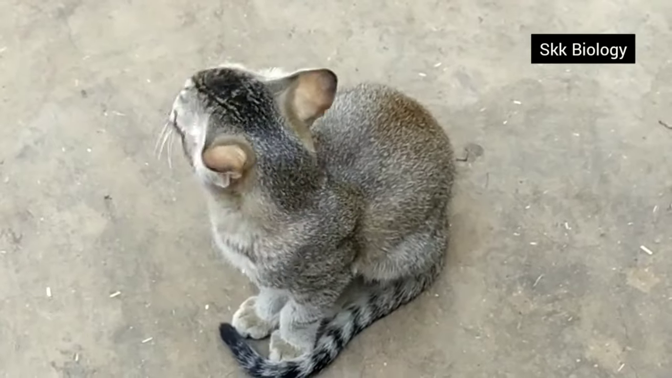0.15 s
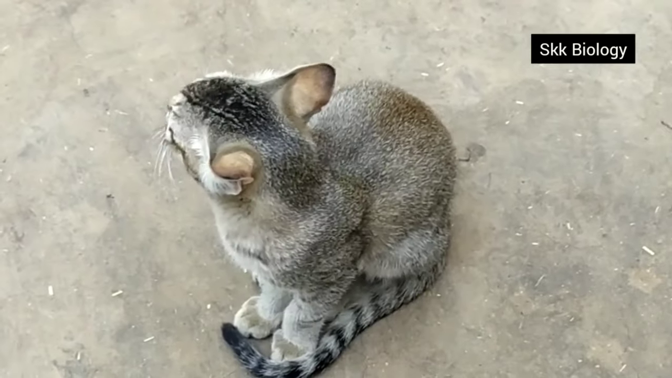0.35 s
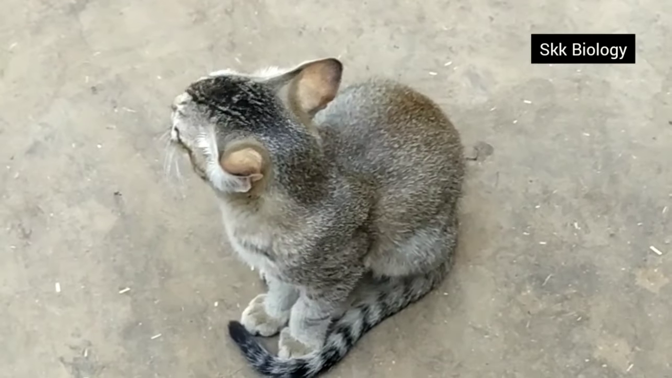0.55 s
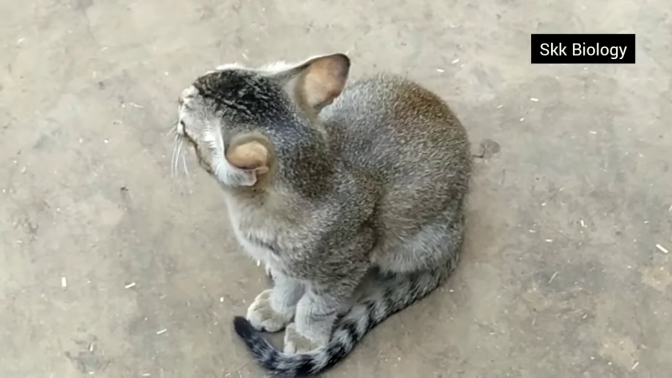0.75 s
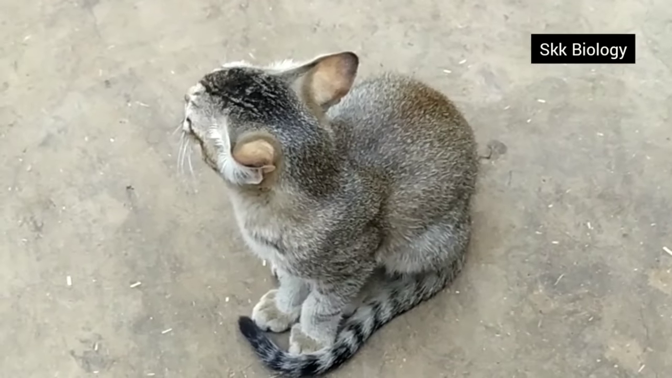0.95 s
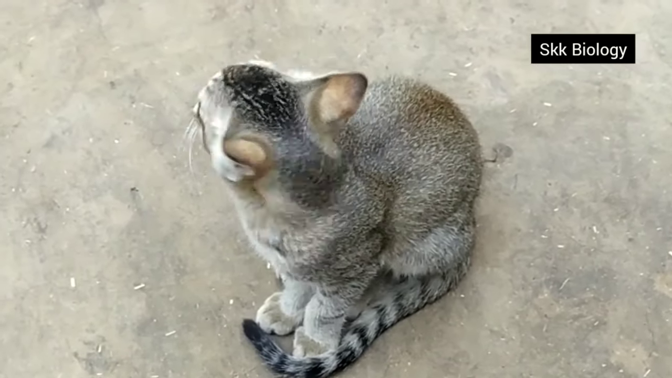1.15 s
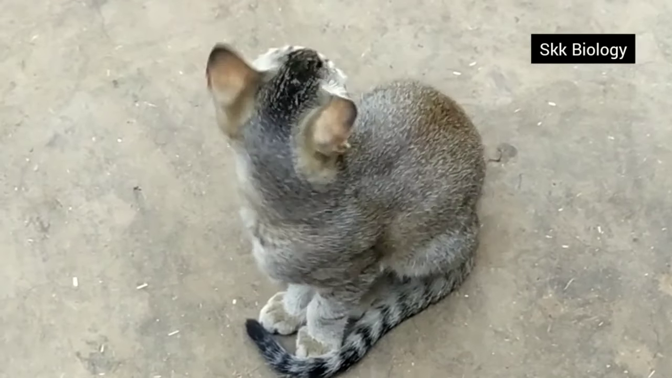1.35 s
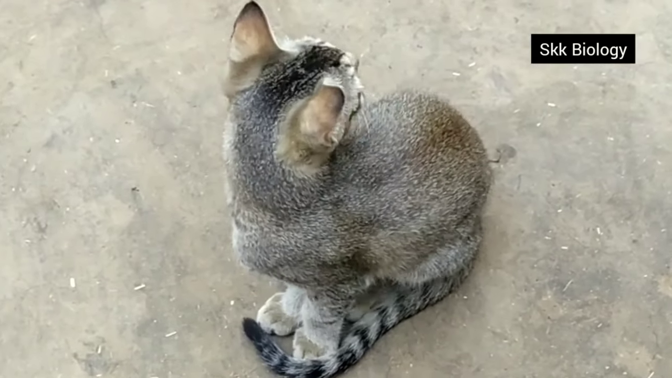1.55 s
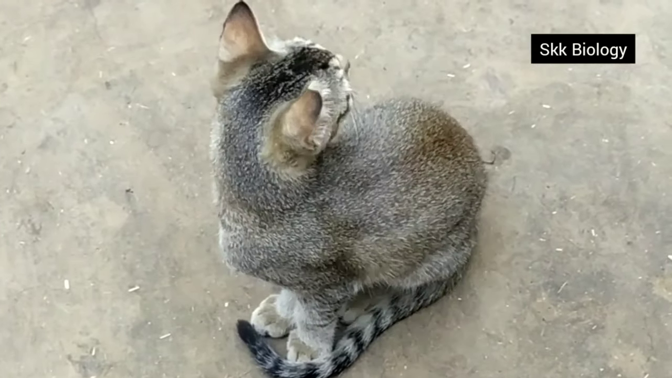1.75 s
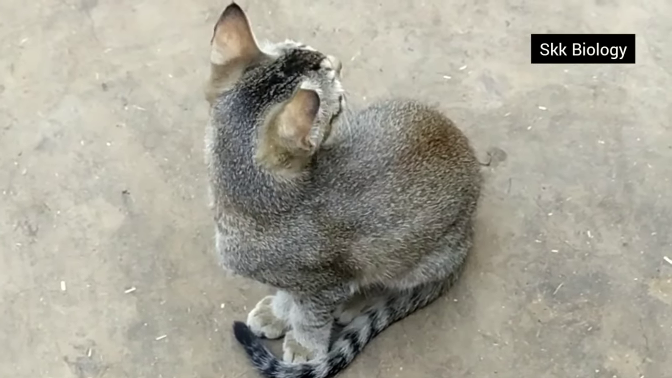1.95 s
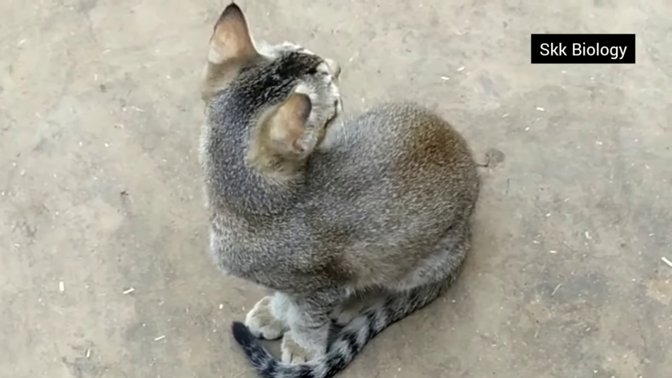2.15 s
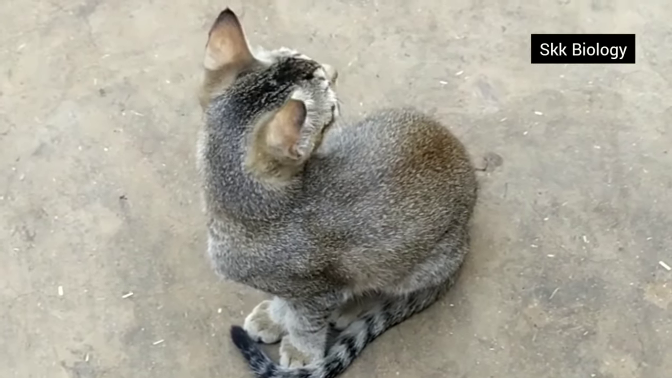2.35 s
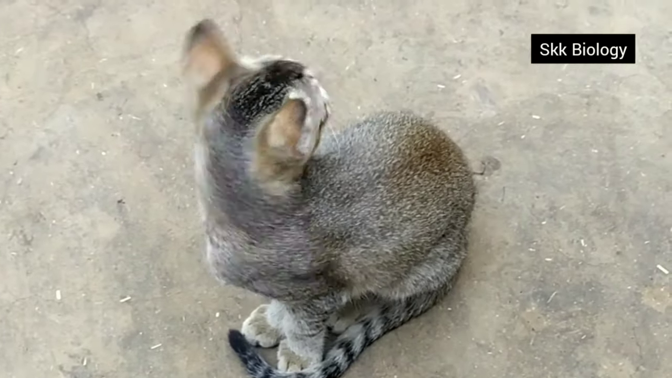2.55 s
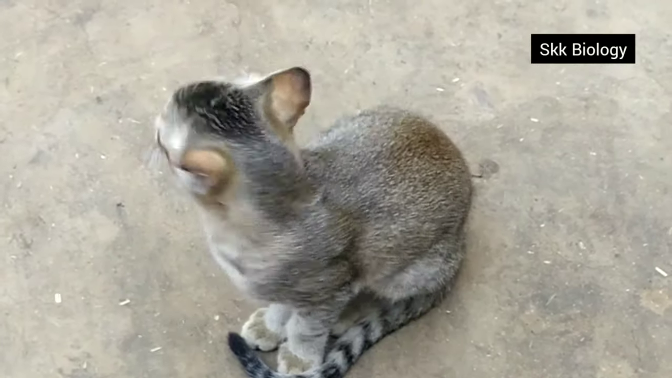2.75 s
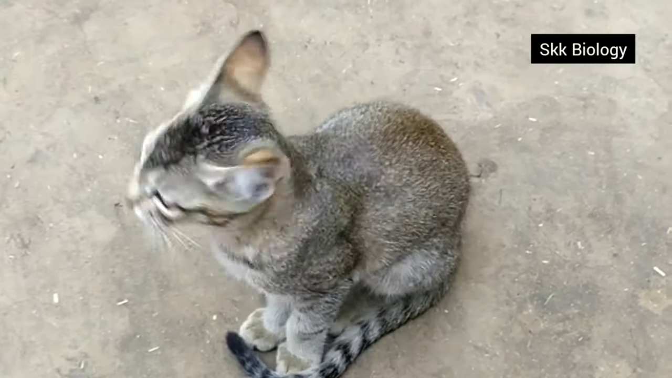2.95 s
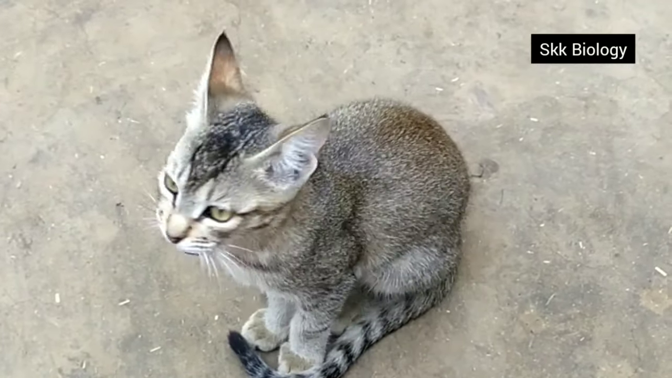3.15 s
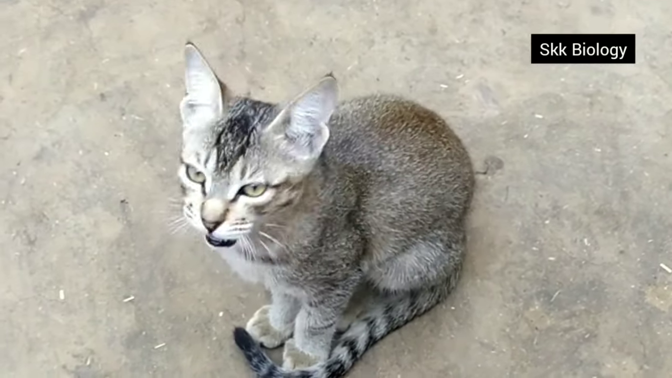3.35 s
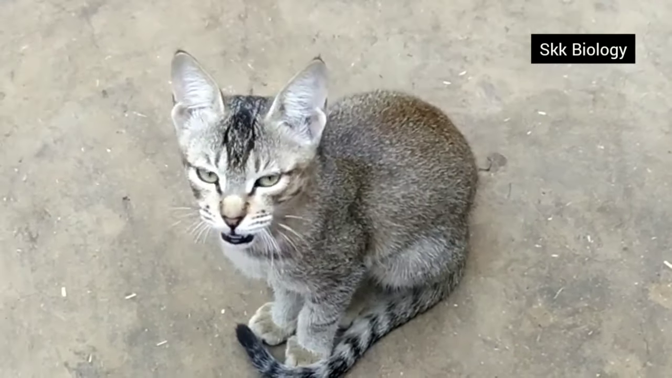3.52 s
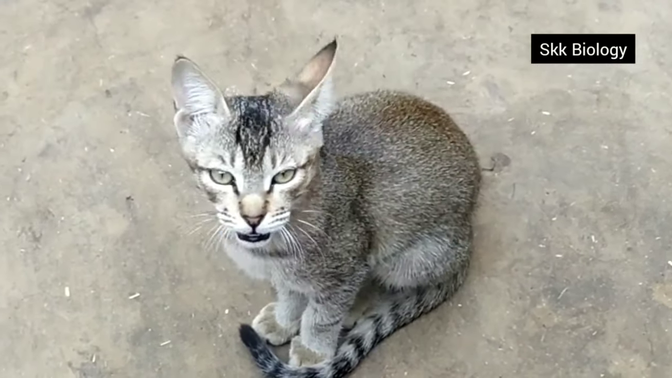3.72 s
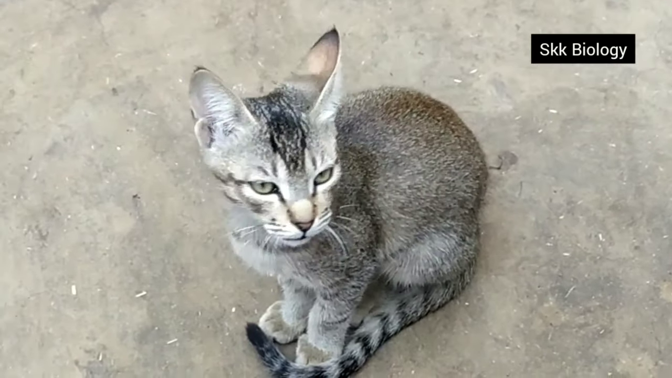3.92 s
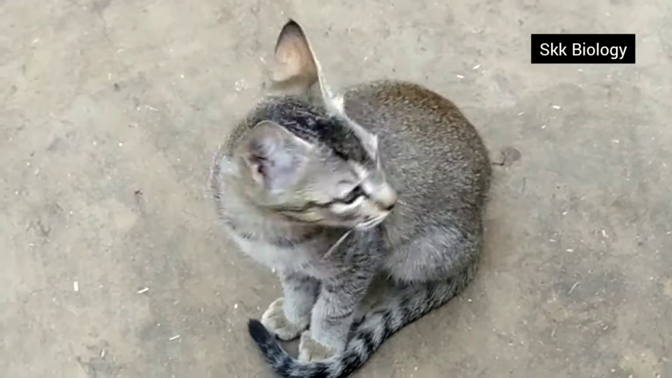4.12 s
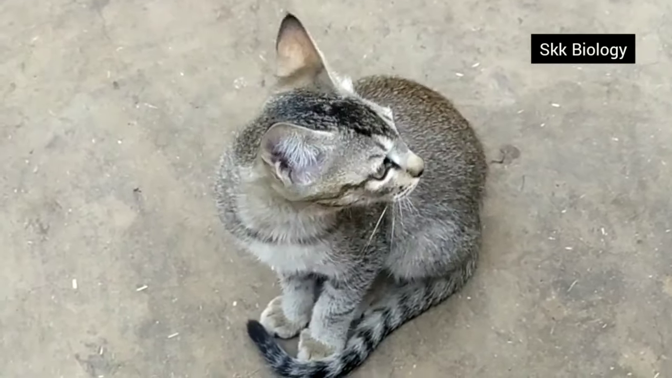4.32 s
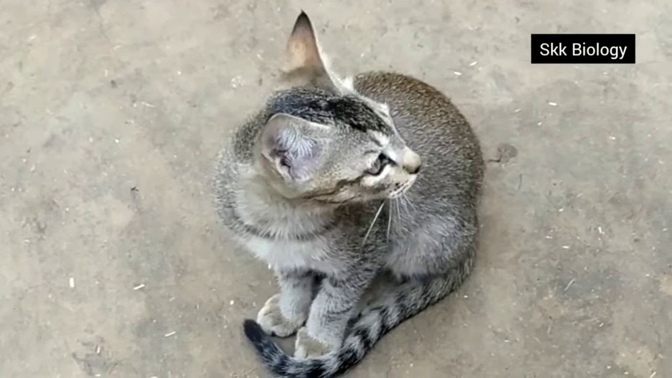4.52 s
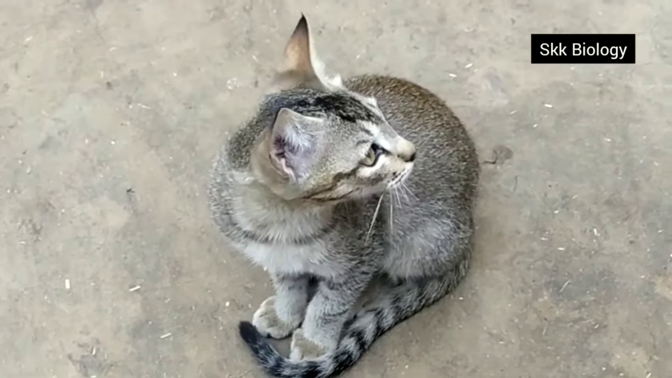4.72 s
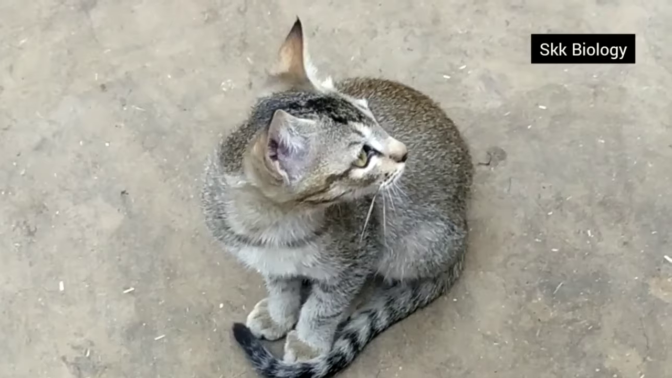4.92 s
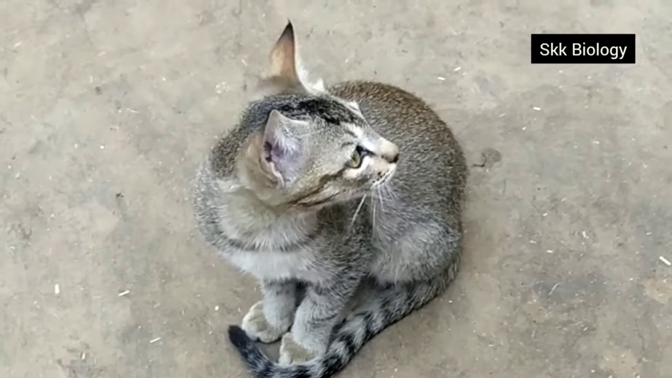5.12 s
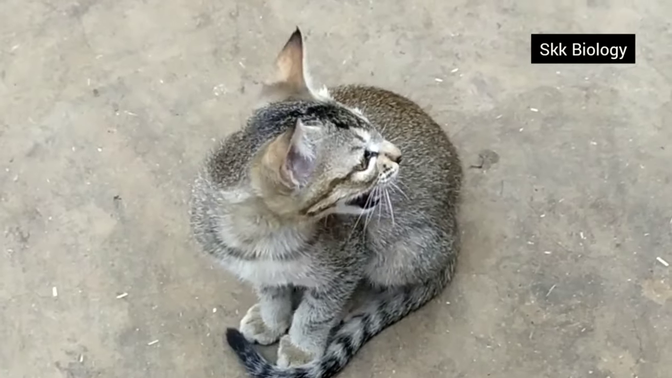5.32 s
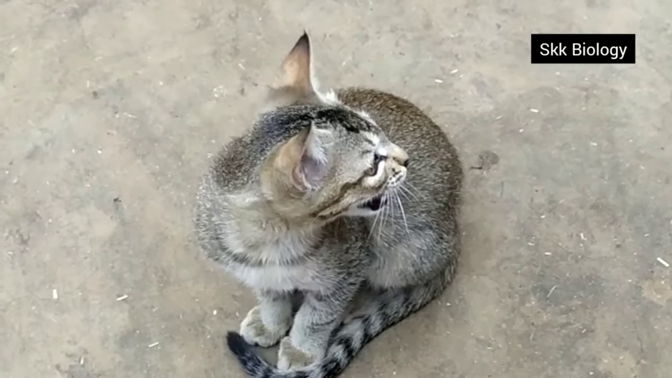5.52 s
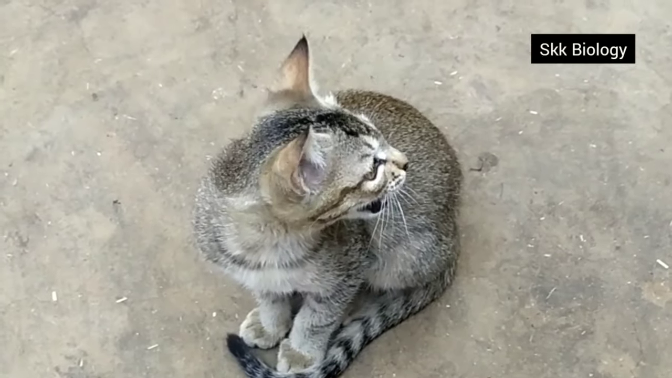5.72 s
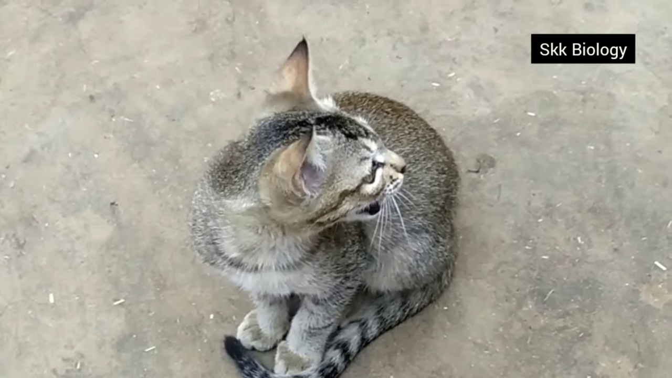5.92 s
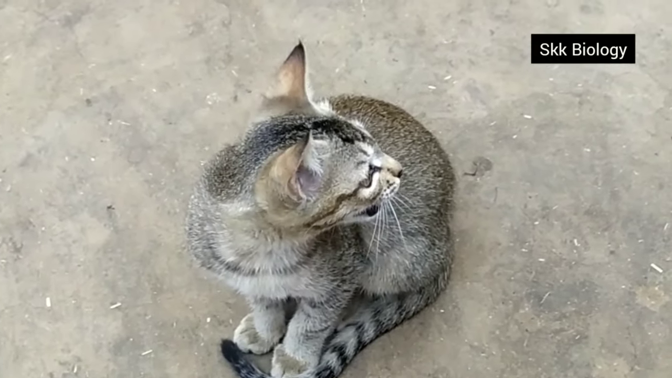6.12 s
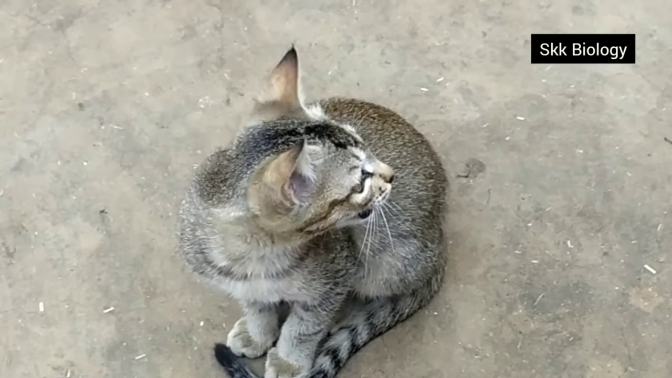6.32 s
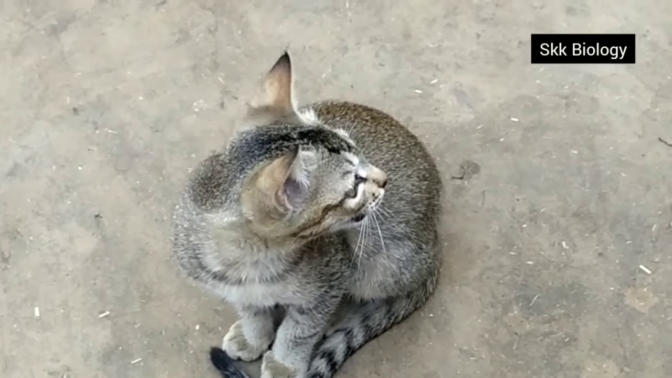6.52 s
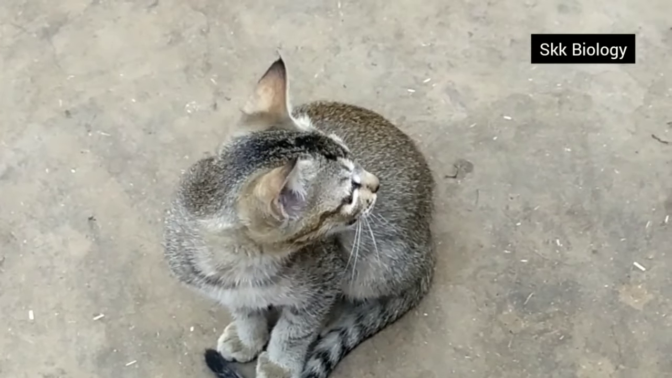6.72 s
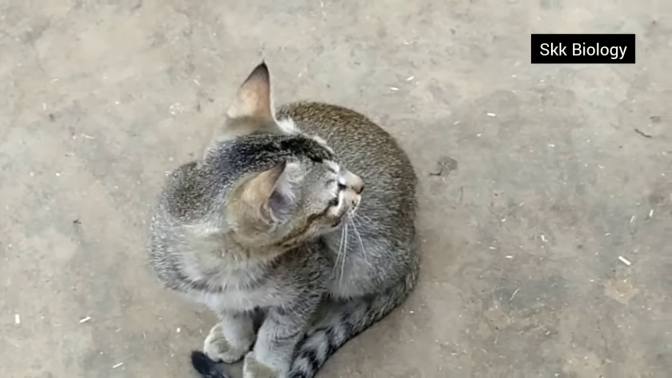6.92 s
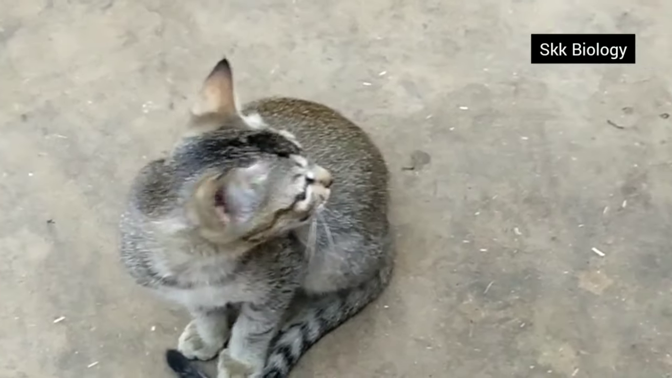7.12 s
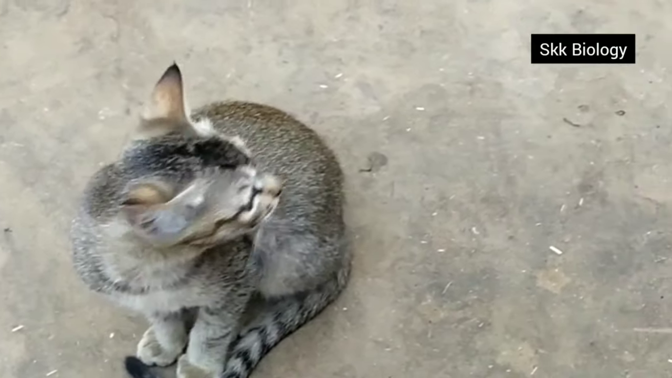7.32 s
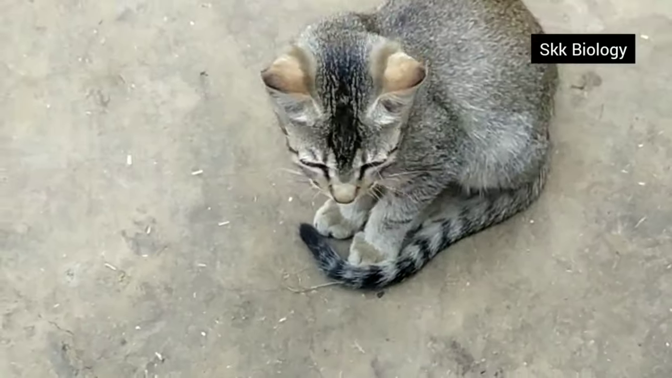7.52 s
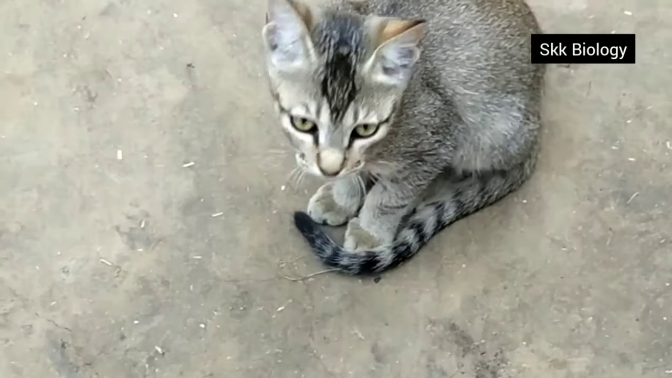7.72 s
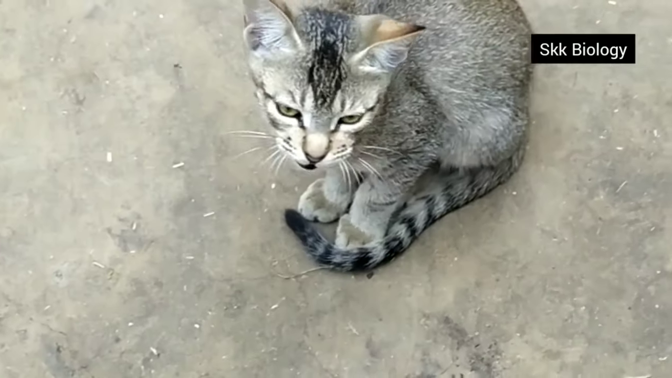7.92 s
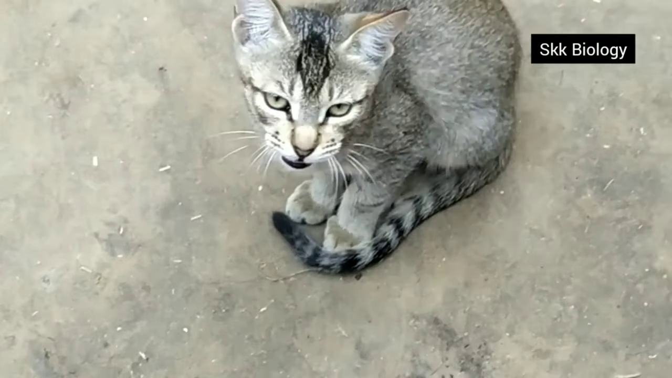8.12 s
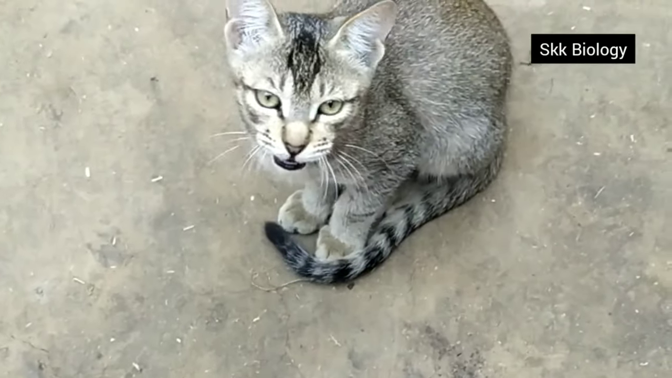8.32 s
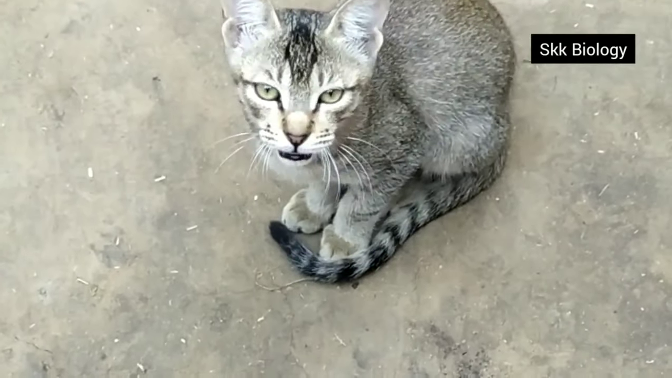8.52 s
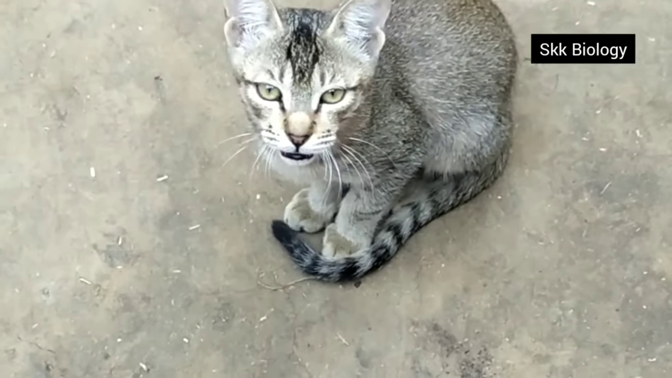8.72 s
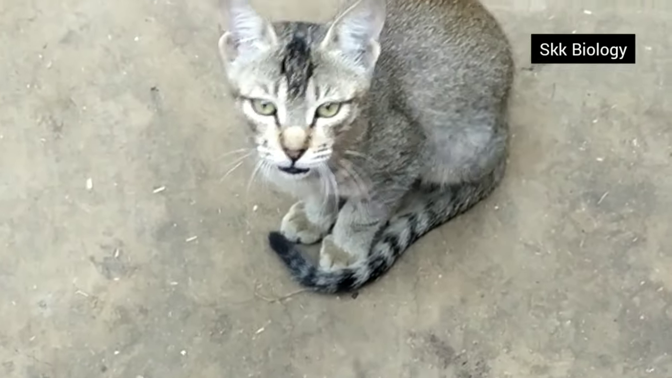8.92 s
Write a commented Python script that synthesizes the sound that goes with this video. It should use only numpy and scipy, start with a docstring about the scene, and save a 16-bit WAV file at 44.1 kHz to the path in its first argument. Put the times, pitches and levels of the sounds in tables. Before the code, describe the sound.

A kitten meows four times, close to a hand-held microphone in a quiet, hard-floored room with a short echo. Each cry is thin, high and nasal, rising quickly and sagging slowly. After the first and second meows a hollow knock sounds further off. Small dry ticks, gritty scuffs and soft low bumps fall around the calls. The third meow stops abruptly; a fourth, strong one follows over faint rumble and hiss.

```python
"""A kitten on a concrete floor, close to a hand-held phone, gives four long, thin meows from the start on.
Each is a stack of harmonics shaped by a mouth that opens quickly and closes slowly; the third is cut short.
After the first meow and again after the second, a cluster of blows further off makes a knock.
Ticks (snap and ringing body), scuffs (grit noise over a thud) and bumps (low dying notes) fall in between.
Rumble and hiss, both shaped noise, run quietly throughout; the top is dull."""
import sys
import numpy as np
from scipy import signal
from scipy.fft import rfft, irfft
from scipy.io import wavfile

SR = 44100
rng = np.random.default_rng(int(sys.argv[2]) if len(sys.argv) > 2 else 0)


def wav_record(signal):
    """Record a signal, one row per channel, as 16-bit PCM in the file named by sys.argv[1]."""
    frames = np.transpose(np.atleast_2d(signal))
    bounded = np.clip(frames, -1, 1)
    # unit amplitude maps onto the largest positive 16-bit level
    quanta = np.round(bounded * 32767).astype(np.int16)
    wavfile.write(sys.argv[1], SR, quanta)


N = 399546
TIME = np.arange(N) / SR
FREQ = np.arange(N // 2 + 1) * SR / N
SIDES = np.array([[1], [-1]])  # left, right port

# voice
THROAT_HZ = 2824
MOUTH_WIDTH_HZ, THROAT_WIDTH_HZ, HEAD_WIDTH_HZ = 110, 210, 390
VOICE_DB = -0.63  # gain of the whole voice
RELEASE_S = 0.0006
TURBULENCE_OVER_MOUTH = 1.08  # centre re mouth resonance
RING_PEAK_HZ = 7910  # peak of the ring spectrum before it is moved
EDGE_DB_PER_DB, EDGE_FROM_DB = 0.3, -58.5  # treble tilt per octave, per dB of ring re this level
PORT_SKEW_RAD, PORT_LAG_S = 0.26, 0.000025  # phase scatter at each port, delay between them
SWAY_DB, SHIMMER_DB = 1.5, 1.1  # slower and quicker unevenness of each harmonic in a clean voice
FLUTTER_DB = 1.5  # quick unevenness that full hoarseness adds
FULL_FLUTTER_HZ = 2400  # harmonics below this are steadier
HOARSE_LOSS = 0.24  # share of the upper harmonics lost at full hoarseness


def undb(db):
    """Decibels to gain."""
    return 10 ** (np.asarray(db) / 20)


def unit(x):
    """Scale to rms 1."""
    return x / np.sqrt(np.mean(x ** 2))


def curves(table, t):
    """The columns of a table at times t."""
    s, *columns = np.transpose(table)
    return [np.interp(t, s, c) for c in columns]


def shape(points, hz):
    """Gain of a (Hz, dB) spectrum at the given frequencies."""
    f, db = np.transpose(points)
    return undb(np.interp(np.log(hz + 1), np.log(f), db))


def resonance(hz, centre_hz, width_hz):
    """Gain of a steep band-pass: one resonance applied twice."""
    return 1 / (1 + ((hz ** 2 - centre_hz ** 2) / (hz * width_hz + 1)) ** 2)


def noise(gain):
    """Noise of rms 1 with a given gain at each frequency."""
    return unit(irfft(rfft(rng.standard_normal(N)) * gain, N))


def walk(rate_hz):
    """Smooth chance of spread 1."""
    return noise(1 / (1 + (FREQ / rate_hz) ** 4))


def reflections(x, mid_db, side_db, t60):
    """Dense echoes that differ between the ports."""
    t = TIME[:SR // 2]
    decay = undb(-60 * t / t60) * (1 + 2.0 * np.exp(-t / 0.012)) * (t > 0.002)
    tails = rng.standard_normal((2, len(t))) * decay
    mid, side = (signal.fftconvolve(x, tail / np.linalg.norm(tail))[:N] for tail in tails)
    return undb(mid_db) * mid + undb(side_db) * side * SIDES


def room(x, pan_db, mid_db, side_db, t60=0.51):
    """Direct sound, one sample later at the left port, plus its echoes."""
    direct = np.array([np.r_[0, x[:-1]], x]) * undb(SIDES * pan_db / 2)
    return direct + reflections(x, mid_db, side_db, t60)


def kitten():
    """Four meows in the room; the third is cut short, together with its echo."""
    # one row per meow: (start [s], end [s], attack [s], fundamental [dB])
    meow_table = [(0, 1.121, 0.063, -69), (2.698, 4.196, .07, -68), (5.202, 7.393, 0.038, -74),
                  (7.83, 9.066, 0.057, -67.5)]
    # pitch of each meow, a quick rise and a long sag: (time [s], pitch [Hz])
    pitch_tables = [
        [(0.0, 583), (0.06, 633.7), (0.194, 640), (0.53, 603.8), (0.71, 597), (0.918, 538), (0.934, 525),
         (1.056, 510), (1.09, 492.5)],
        [(2.7, 508), (2.736, 517), (2.81, 583), (2.958, 606.2), (3.31, 595.3), (3.384, 611.4), (3.668, 586.4),
         (3.89, 545), (4.006, 528), (4.13, 498.5), (4.18, 461)],
        [(5.23, 454), (5.26, 506), (5.4, 617), (5.46, 625.7), (5.61, 607), (5.93, 603.9), (6.64, 535.8),
         (6.79, 530.4), (6.81, 541.5), (7.39, 547.8)],
        [(7.84, 471), (7.876, 574), (7.89, 607), (7.92, 634.7), (8.102, 645.8), (8.27, 632), (8.382, 644),
         (8.466, 624.6), (8.52, 612.2), (8.742, 603.3), (9.05, 577.6)],
    ]
    # mouth resonance, rising as the jaw opens and sinking as it closes: (time [s], centre [Hz], level [dB])
    mouth_tables = [
        [(0.0, 2190, -45), (0.08, 2210, -60), (0.2, 2000, -57), (0.29, 2180, -51), (0.39, 2087, -44.5),
         (0.45, 2040, -50.5), (0.53, 2030, -54), (0.585, 1906, -43), (0.67, 1920, -42), (0.695, 1888, -52),
         (0.75, 1904, -49.5), (0.88, 1790, -66), (1.0, 1880, -64.5), (1.1, 2160, -69)],
        [(2.69, 1620, -50), (2.78, 2055, -56.5), (3.03, 2150, -48.5), (3.28, 1990, -45), (3.42, 2160, -39.5),
         (3.62, 2050, -43.5), (3.78, 1953, -39.0), (3.95, 1720, -42), (4.07, 1690, -49), (4.19, 1678, -58.5)],
        [(5.22, 1680, -60), (5.31, 1810, -63), (5.345, 1860, -52), (5.42, 2150, -53), (5.55, 2114, -48.5),
         (5.68, 2065, -43), (5.95, 2110.0, -39.5), (6.12, 1984, -42), (6.32, 1770, -41), (6.48, 1783, -54),
         (6.7, 1840, -58.5), (6.98, 1790, -51), (7.18, 1900, -53), (7.39, 1990, -50)],
        [(7.84, 1990, -47.5), (7.92, 2210, -54), (8.01, 2200, -57), (8.06, 2385, -40.5), (8.14, 2305, -43),
         (8.18, 2183, -49), (8.4, 2184, -42.5), (8.51, 1926, -35.5), (8.64, 1996, -40.5), (8.85, 1938, -37),
         (9.05, 1775, -33)],
    ]
    # throat resonance: (time [s], level [dB])
    throat_tables = [
        [(0.0, -62), (0.08, -51), (0.2, -51.5), (0.4, -68), (0.55, -59), (0.72, -68), (0.9, -77), (1.1, -97)],
        [(2.69, -57), (2.8, -55.5), (3.02, -52), (3.3, -58), (3.45, -48.5), (3.78, -69), (3.95, -54),
         (4.1, -54), (4.19, -63)],
        [(5.22, -53.5), (5.28, -49), (5.44, -40.5), (5.7, -54), (6.03, -65), (6.35, -54.5), (6.55, -64),
         (7.0, -58.5), (7.39, -60.5)],
        [(7.84, -58), (7.93, -50), (8.1, -49.5), (8.38, -87), (8.53, -57), (8.7, -69), (9.05, -62)],
    ]
    # head resonance: (time [s], centre [Hz], level [dB])
    head_tables = [
        [(0.0, 3660, -50), (0.07, 3830.0, -50.5), (0.22, 3950, -55.5), (0.42, 3940, -60), (0.68, 3990.0, -64.5),
         (0.8, 3800, -72), (1.1, 3900, -101.0)],
        [(2.69, 3240, -70), (2.8, 3670, -56), (2.93, 3900, -52), (3.15, 3890, -57.5), (3.35, 3960, -59),
         (3.7, 3910, -58.5), (3.95, 3240, -51.5), (4.08, 3320, -67), (4.19, 3436, -74)],
        [(5.22, 4140, -62), (5.33, 3560, -49), (5.42, 4050, -43), (5.6, 3850, -47), (5.92, 3740, -46),
         (6.06, 3990, -53), (6.25, 3630, -62.5), (6.55, 3910, -61.5), (7.0, 3840, -59), (7.39, 4050, -57.5)],
        [(7.84, 3970, -56), (7.93, 3870, -50), (8.08, 3860, -47), (8.22, 3770, -58.5), (8.45, 3880, -55),
         (8.72, 3630, -49.5), (8.88, 3516, -53.5), (9.05, 3580, -56)],
    ]
    # (time [s], second harmonic [dB], treble ring [dB], hoarseness [0-1, clipped])
    voice_tables = [
        [(0, -51, -78, 0.7), (.1, -72, -72, 0.28), (.42, -58.5, -66, 0.17), (.7, -60, -72, 0.06),
         (.82, -51, -71, 0.25), (.9, -65, -68, 0.08), (1.1, -62.5, -80, 0.4)],
        [(2.69, -62, -76, 1.1), (2.82, -68, -74, 0.42), (3.05, -57, -59, 0.26), (3.25, -55.5, -65.5, 0.08),
         (3.45, -55, -56.5, 0.11), (3.8, -58.5, -60, 0.1), (3.97, -57.5, -68, 0.07), (4.1, -49.5, -69, 0.34),
         (4.19, -63.5, -80, 1.2)],
        [(5.22, -66, -66, 1), (5.33, -64, -65.5, 0.5), (5.41, -58.5, -56.5, 0.15), (5.9, -51, -53, 0.1),
         (6.4, -54, -62, 0.13), (6.62, -58, -62, 0.23), (6.9, -53.5, -59, 0.44), (7.15, -52, -58, 0.42),
         (7.39, -47, -58, 0.67)],
        [(7.84, -54.5, -55, 0.73), (7.93, -56, -63.5, 0.04), (8.25, -55.5, -60, 0.14), (8.42, -51, -62.5, 0.1),
         (8.55, -52.5, -61.5, 0.02), (8.72, -48, -64, 0.05), (8.93, -47.5, -57.5, 0.14),
         (9.05, -45.5, -61.5, 0)],
    ]
    # turbulence in mouth, throat, head, treble ring: (width [Hz], level re harmonics [dB])
    turbulence = [(570, -6), (436, -8.5), (750, -6.5), (1990, -0.5)]
    cut_s, cut_fade_s = 7.402, 0.0097

    # shares of the pitch: waver scales with hoarseness, tremble is always there
    waver = 0.00805 * walk(66.4) + 0.0071 * walk(216)
    tremble = 0.0012 * walk(31)
    rush = [undb(db) * walk(width / 2) for width, db in turbulence]
    controls = zip(meow_table, pitch_tables, mouth_tables, throat_tables, head_tables, voice_tables)
    *early, last = (meow(*control, waver, tremble, rush) for control in controls)
    return sum(early) * np.clip((cut_s - TIME) / cut_fade_s, 0, 1) + last


def meow(row, pitch_curve, mouth_curve, throat_curve, head_curve, voice_curve,
         waver, tremble, rush, count=25):
    """Vocal-fold harmonics weighted by moving resonances; a hoarse voice flutters and carries noise."""
    # treble ring of the voice: (frequency [Hz], level [dB])
    ring_spectrum = [(3500, -32), (4800, -14.5), (5500, -9), (6200, -9.5), (7200, -4), (7900, 0.5),
                     (8600, -5), (9600, -17.5), (10500, -18.5), (11600, -18), (13000, -22), (15000, -37)]
    # where the ring peaks: (time [s], peak [Hz])
    ring_peak = [(0, 7800), (.4, 7900), (.75, 9200), (2.7, 7400), (3.1, 7620), (3.42, 7630), (3.8, 8380),
                 (4.2, 7940), (5.25, 6880), (5.6, 7700), (5.95, 8100), (6.3, 8820), (6.7, 7890),
                 (7.4, 7800), (7.95, 6900), (8.15, 7330), (8.4, 8150), (9.05, 7150)]
    # left over right: (time [s], level [dB])
    voice_pan = [(0, -1.5), (.33, 5.5), (.75, 3.5), (1.1, 4), (2.8, 2.5), (3.3, 3), (3.6, 2.5), (3.95, 1),
                 (4.2, -0.5), (5.3, 3), (6, 2), (6.35, 7.5), (6.6, 6), (7, 7), (7.4, 4), (7.9, 3.5),
                 (8.5, 0), (9.05, 2.5)]

    start, end, attack, fundamental_db = row
    span = (TIME >= start) & (TIME <= end)
    t = TIME[span]
    slow = t[::64]  # control times

    def fine(control):
        """Control curve at the full sample rate."""
        return np.interp(t, slow, control)

    def wander(size):
        """Smooth chance per harmonic, one draw every `size` control steps."""
        draws = rng.standard_normal((count, len(slow) // size))
        return signal.resample(draws, len(slow), axis=1)

    pitch, = curves(pitch_curve, slow)
    mouth_hz, mouth_db = curves(mouth_curve, slow)
    throat_db, = curves(throat_curve, slow)
    head_hz, head_db = curves(head_curve, slow)
    low_db, ring_db, hoarse = curves(voice_curve, slow)
    ring_hz, = curves(ring_peak, slow)
    hoarse = np.clip(hoarse, 0, 1)
    partial_hz = np.arange(1, count + 1)[:, None] * pitch

    # the harder the cry, the stronger its highest harmonics; they swell and fade one by one as the head moves
    octaves_up = np.clip(np.log2(partial_hz / ring_hz), 0, 1)
    edge_db = EDGE_DB_PER_DB * (ring_db - EDGE_FROM_DB) * octaves_up
    ring = shape(ring_spectrum, partial_hz * RING_PEAK_HZ / ring_hz) * undb(edge_db + 1.7 * wander(size=80))
    layers = [(resonance(partial_hz, mouth_hz, MOUTH_WIDTH_HZ), mouth_db),
              (resonance(partial_hz, THROAT_HZ, THROAT_WIDTH_HZ), throat_db),
              (resonance(partial_hz, head_hz, HEAD_WIDTH_HZ), head_db),
              (ring, ring_db)]
    power = sum((gain * undb(db)) ** 2 / np.sum(gain ** 2, axis=0) for gain, db in layers)
    # the two lowest harmonics leak out below the resonances
    power[0] += undb(fundamental_db) ** 2
    power[1] += undb(low_db) ** 2
    flutter_db = SWAY_DB * wander(size=22) + (SHIMMER_DB + FLUTTER_DB * hoarse) * wander(size=6)
    amplitude = np.sqrt(2 * power) * undb(flutter_db * np.minimum(partial_hz / FULL_FLUTTER_HZ, 1))
    amplitude[2:] *= 1 - HOARSE_LOSS * hoarse ** 2

    # uneven cycles blur the high harmonics most
    rough = fine(hoarse)
    phase = 2 * np.pi * np.cumsum(fine(pitch) * (1 + tremble[span] + rough * waver[span])) / SR
    # the floor close by turns each harmonic to a different phase at the two ports
    scatter = PORT_SKEW_RAD * wander(size=110) * np.minimum(partial_hz / 1500, 1)
    skew = scatter - np.pi * partial_hz * PORT_LAG_S
    voice = sum(fine(amplitude[k]) * np.sin((k + 1) * phase + SIDES * fine(skew[k])) for k in range(count))

    # turbulence follows the resonances and puffs once a cycle
    centres = [TURBULENCE_OVER_MOUTH * mouth_hz, np.full(len(slow), THROAT_HZ), head_hz, ring_hz]
    puffs = 0
    for (_, db), band, hz, turn in zip(layers, rush, centres, skew):
        carrier = np.sin(2 * np.pi * np.cumsum(fine(hz)) / SR + SIDES * fine(turn))
        puffs = puffs + fine(undb(db)) * band[span] * np.sqrt(2) * carrier
    voice += rough * puffs * (1 + 0.3 * np.cos(phase))

    pan_db, = curves(voice_pan, t)
    envelope = np.clip(np.minimum((t - start) / attack, (end - t) / RELEASE_S), 0, 1)
    out = np.zeros((2, N))
    out[:, span] = undb(VOICE_DB + SIDES * pan_db / 2) * voice * envelope
    return out + reflections(out[0], mid_db=-11.0, side_db=-8.5, t60=0.53)


def knocks():
    """A hard blow some way off: one short, hollow note, then the room rings, longest at the ends of its range."""
    # blows: (time [s], level [dB], note [Hz])
    blow_table = [(1.873, -61.5, 493), (1.9049, -45.5, 378), (1.9114, -36.5, 787), (1.9228, -46.5, 1280),
                  (1.954, -51.5, 1330), (1.967, -49.5, 770), (3.47, -75, 380), (4.649, -56, 604),
                  (4.6585, -44, 820), (4.682, -58.5, 497), (6.264, -59, 410)]
    # what a knock rings with: (frequency [Hz], level [dB], t60 [s])
    bands = np.array([(36.8, -22, 0.5), (80, 2, 1), (138, -17, 0.9), (220, -0.5, 0.62), (350, 3, 0.4),
                      (790, 3, 0.38), (910, 2.5, 0.38), (1330, 1.5, 0.35), (1840, -5, 0.34),
                      (2100, -8, 0.36), (2620, -16, 0.5), (4020, -16.5, 0.43), (5550, -22.5, 0.37),
                      (8250, -25.5, 0.89), (15060, -44, 1)])
    note_db, note_attack_s, note_decay_s = 20.5, 0.0013, 0.0027  # level re the blow
    clump_db = 2.2

    blows, notes = np.zeros((2, N))
    t = TIME[:SR]
    note_envelope = (1 - np.exp(-(t / note_attack_s) ** 2)) * np.exp(-t / note_decay_s)
    for s, db, hz in blow_table:
        i = int(s * SR)
        blows[i] += undb(db)
        notes[i:i + SR] -= undb(db + note_db) * np.sin(2 * np.pi * hz * t) * note_envelope

    colour = shape(bands[:, :2], FREQ)
    ring = np.zeros((2, SR))
    for (hz, _, t60), pick in zip(bands, np.eye(len(bands))):
        # overlapping bands whose powers add up to the colour
        gain = colour * np.sqrt(np.interp(np.log(FREQ + 1), np.log(bands[:, 0]), pick))
        level = np.linalg.norm(gain) / np.linalg.norm(colour)
        mid, side = noise(gain)[:2 * SR].reshape(2, SR) * level
        envelope = 1.2 * (1 - np.exp(-t / 0.00068)) * undb(-60 * t / t60)
        ring += envelope * (mid + 0.97 * min(hz / 650, 1) * side * SIDES)  # the bass is narrower
    # echoes arrive in clumps
    ring *= undb(clump_db * walk(120)[:SR])
    return notes + signal.fftconvolve(blows[None], ring, axes=1)[:, :N]


def ticks():
    """Each tick is a bright snap of band-passed noise and a briefly ringing body."""
    # (time [s], snap [Hz], snap level [dB], body [Hz], body level before +5 dB [dB], snap decay [s])
    tick_table = [(0.212, 9000, -54, 1120, -48.5, 0.0045), (0.7454, 8560, -24.5, 2200, -31.5, 0.00081),
                  (0.7524, 8000, -40, 2100, -50, 0.0011), (0.88, 7450, -52, 1950, -55, 0.0015),
                  (0.984, 10100, -44, 811, -55, 0.0015), (.997, 11040, -50, 800, -53, .0018),
                  (1.045, 8550, -54, 830, -50, .0018), (1.319, 3980, -53, 890, -55.5, 0.0015),
                  (1.666, 8500, -57, 930, -56, .0018), (1.7605, 9600, -39, 2500, -60, .001),
                  (1.7674, 9800, -37, 2900, -49, 0.0016), (1.777, 5500, -44, 2030, -41, 0.0015),
                  (1.782, 4900, -38.5, 2000, -39, 0.0017), (1.7863, 9500, -41, 1960, -39, 0.0012),
                  (1.798, 5000, -44, 2100, -59, 0.001), (2.585, 9000, -54.5, 1210, -58, 0.0033),
                  (2.677, 8500, -59, 1150, -55, 0.0036), (2.702, 7000, -50, 1290, -54, 0.0024),
                  (2.886, 8500, -48, 846, -54, .002), (3.212, 8500, -68, 1900, -48, .003),
                  (3.397, 9300, -35.5, 1390, -42.5, 0.0018), (4.0925, 8350, -29.5, 2080, -54, 0.00065),
                  (4.1247, 6200, -27, 3000, -44, 0.00029), (4.1249, 13100, -38, 6000, -54, .0004),
                  (4.27, 7430, -48, 1500, -72, 0.0015), (4.286, 8500, -56, 1470, -52, 0.0027),
                  (4.299, 8460, -47.5, 1620, -71, .002), (4.591, 7600, -52, 4000, -61, .0014),
                  (4.833, 5800, -37.5, 4350, -46.5, .0012), (4.864, 8500, -49, 2090, -49, 0.0027),
                  (4.887, 4930, -38, 2140, -42, 0.0014), (4.889, 9000, -43.5, 1740, -38, 0.0023),
                  (5.176, 7850, -42.5, 1990, -45, 0.0017), (5.6454, 8240, -34, 698, -31, 0.00052),
                  (5.6462, 4200, -31, 1960, -27.5, 0.00053), (5.954, 10200, -32.5, 2020, -57, 0.00087),
                  (6.132, 8000, -40, 6100, -41, 0.0013), (7.171, 8500, -55, 1400, -46, .003),
                  (8.323, 7400, -32.5, 1220, -40, 0.0022), (8.355, 10200, -34.5, 3200, -54, 0.0016),
                  (8.78, 8550, -67, 836, -53, 0.0017)]
    snap_width_hz = 3200

    out, t = np.zeros(N + SR), TIME[:2048]
    hz = np.arange(len(t) // 2 + 1) * SR / len(t)
    for s, snap_hz, snap_db, body_hz, body_db, decay in tick_table:
        chance = rng.standard_normal(len(t))
        contact = 1 - np.exp(-(2 * t / decay) ** 2)
        snap = unit(irfft(rfft(chance) * resonance(hz, snap_hz, snap_width_hz))) * np.exp(-t / decay)
        body = np.sin(2 * np.pi * body_hz * t) * np.exp(-t / (0.98 * decay))
        i = int(s * SR)
        out[i:i + len(t)] += contact * (undb(snap_db) * snap + undb(body_db + 5.0) * body)
    return room(out[:N], pan_db=2.0, mid_db=-7.5, side_db=-8.5, t60=0.29)


def scuffs():
    """Grit scratches in uneven grains over a soft thud; stray grains crackle in between."""
    # (time of peak [s], Gaussian half length [s], scratch [dB], thud [dB], brightness [0-1])
    scuff_table = [(0.011, 0.033, -56, -66, 0.37), (0.216, 0.01, -63, -74, 0.8),
                   (1.101, 0.024, -57.5, -60.5, 0.64), (1.147, 0.073, -66, -89, 0.05),
                   (1.473, 0.0096, -59.5, -67.5, 0.2), (0.709, 0.011, -59, -70, 0.8),
                   (1.767, 0.023, -59, -96, 0.5), (2.905, 0.036, -62, -65.5, 0.26),
                   (3.478, 0.012, -56, -56, 0.05), (4.052, 0.016, -61, -62.5, 0),
                   (4.176, 0.029, -57.5, -66.5, 0.43), (4.846, 0.036, -60, -74.5, 0.58),
                   (5.192, 0.015, -69, -63.5, 0.1), (5.432, 0.19, -68, -74, 0),
                   (6.286, 0.045, -59.5, -58.5, 0.26), (6.544, 0.043, -59.5, -79, 0.84),
                   (6.823, 0.016, -73, -66.5, 0.1), (7.057, 0.031, -76, -67.5, 0.1),
                   (7.67, 0.17, -61.5, -74, 0.52), (7.851, 0.029, -47.5, -71.5, 0.92),
                   (8.339, 0.016, -46.5, -75.5, 0.45)]
    # grit scratching: (frequency [Hz], level [dB])
    scratch_spectrum = [(300, -9.5), (1000, 6), (2200, 8.5), (3800, 7), (5300, 0.5), (8000, 0.5),
                        (11000, -6.5), (15500, -16)]
    # the weight behind it: (frequency [Hz], level [dB])
    thud_spectrum = [(30, -11), (85, 6.5), (135, -36), (170, 3.5), (290, 3.5), (450, 0), (900, -8.5),
                     (2000, -20), (8000, -67)]
    bright_hz = 7200  # a light, fast scuff hisses above this
    stray_per_s = 45  # before its rate wanders

    coarse, bright, thud = np.zeros((3, N))
    for s, length, scratch_db, thud_db, brightness in scuff_table:
        swell = np.exp(-0.5 * ((TIME - s) / length) ** 2)
        share = np.clip(brightness, 0, 1)
        coarse += undb(scratch_db) * swell * np.sqrt(1 - share)
        bright += undb(scratch_db) * swell * np.sqrt(share)
        thud += undb(thud_db) * swell

    stray_hits = rng.random(N) < stray_per_s * undb(6 * walk(3)) / SR
    stray = stray_hits * undb(-51 + 1.9 * np.clip(rng.standard_normal(N), -1, 1))
    colour = unit(shape(scratch_spectrum, FREQ))
    bright_colour = unit(colour * FREQ ** 4 / (FREQ ** 4 + bright_hz ** 4))
    grains = undb(-4.5 + 3.7 * walk(120)) * rng.standard_normal((2, N))
    grit = irfft(rfft(coarse * grains[0] + stray) * colour + rfft(bright * grains[1]) * bright_colour, N)
    weight = thud * noise(shape(thud_spectrum, FREQ))
    return (room(grit, pan_db=7.5, mid_db=-0.5, side_db=3.0)
            + room(weight, pan_db=-4.0, mid_db=3.0, side_db=-13))


def bumps():
    """Each bump swells softly into one low, dying note, alike at both ports."""
    # (time [s], note [Hz], level [dB], decay [s])
    bump_table = [(1.076, 177.8, -48, 0.072), (1.085, 433, -60, 0.036), (1.138, 80.4, -51, 0.083),
                  (1.209, 48.7, -52, 0.085), (6.625, 76.8, -43.5, 0.025)]
    attack_s = 0.022
    out = np.zeros(N)
    for s, hz, db, decay in bump_table:
        t = np.maximum(TIME - s, 0)
        envelope = (1 - np.exp(-(t / attack_s) ** 2)) * np.exp(-t / decay)
        out += undb(db) * np.sin(2 * np.pi * hz * t) * envelope
    return out


def air():
    """Rumble mostly shared by both ports and a wide hiss, both slightly restless in level."""
    # the quiet room: (frequency [Hz], density [dB per Hz])
    air_spectrum = [(15, -19), (25, -3), (73, -5), (240, -21), (289, -16.5), (322, -20.5), (567, -22),
                    (741, -24.5), (1240, -27.5), (1380, -31.5), (3340, -34), (3720, -34.5), (5400, -36),
                    (6730, -31.5), (10500, -35), (15500, -40)]
    rumble_db, hiss_db = -67.5, -70.5  # of the part that both ports share

    colour = shape(air_spectrum, FREQ) * FREQ ** 4 / (FREQ ** 4 + 32 ** 4)
    treble = FREQ / (FREQ + 250)
    low, high = colour * (1 - treble), colour * treble
    rumble = undb(rumble_db + 1.2 * walk(7)) * (noise(low) + 0.2 * noise(low) * SIDES)
    hiss = undb(hiss_db + 1.3 * walk(7)) * (noise(high) + 0.66 * noise(high) * SIDES)
    return rumble + hiss


def scene():
    """Everything in the room."""
    return kitten() + knocks() + ticks() + scuffs() + bumps() + air()


def record(dry):
    """The top is dull: a steep low-pass."""
    top_hz = 15800
    return signal.sosfilt(signal.ellip(10, 0.2, 70, top_hz, fs=SR, output="sos"), dry)


dry = scene()
out = record(dry)
wav_record(out)
```